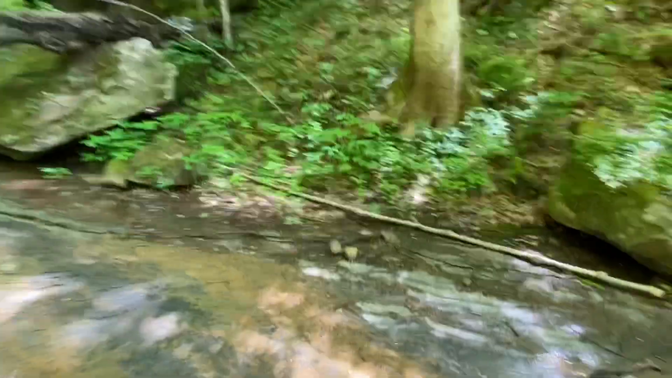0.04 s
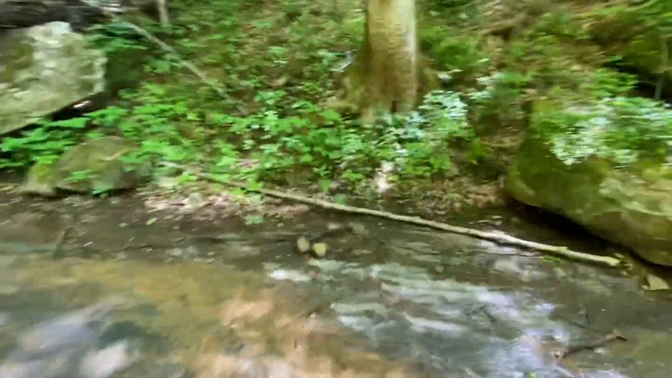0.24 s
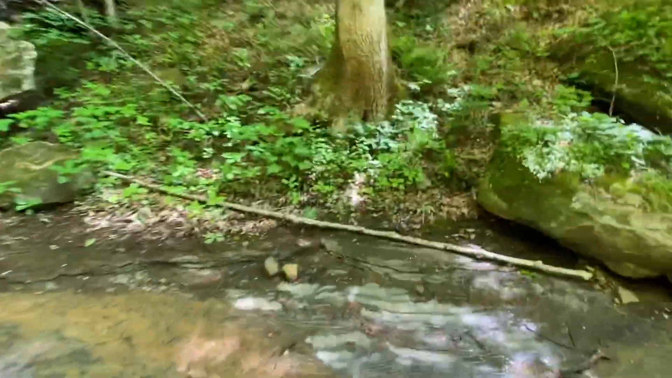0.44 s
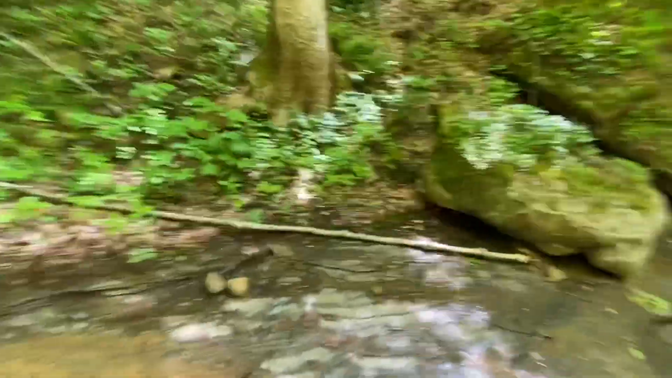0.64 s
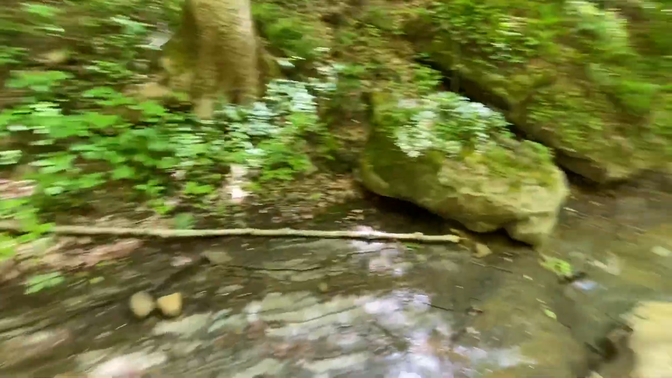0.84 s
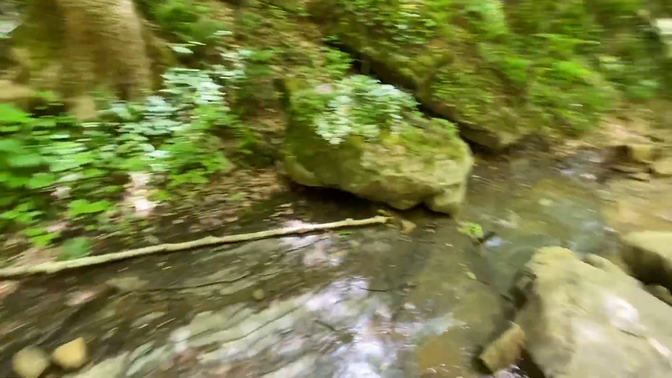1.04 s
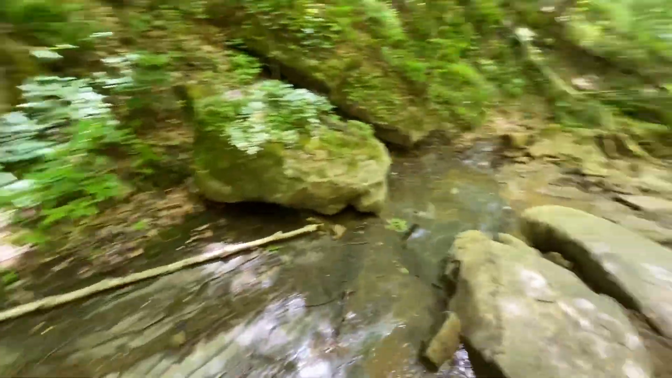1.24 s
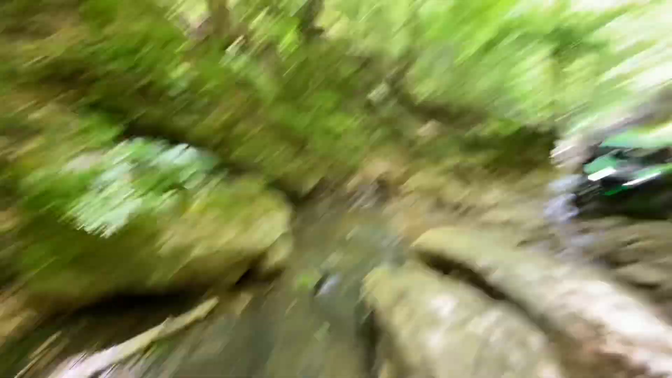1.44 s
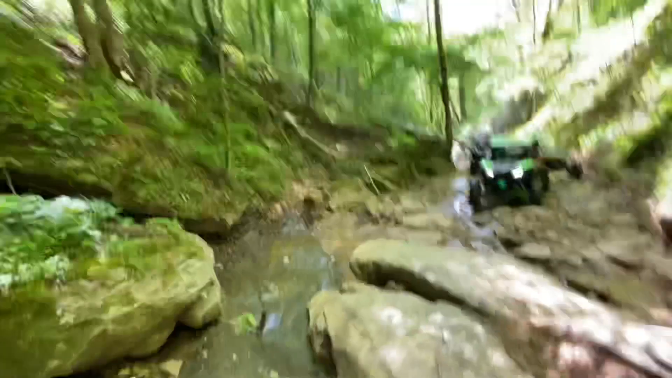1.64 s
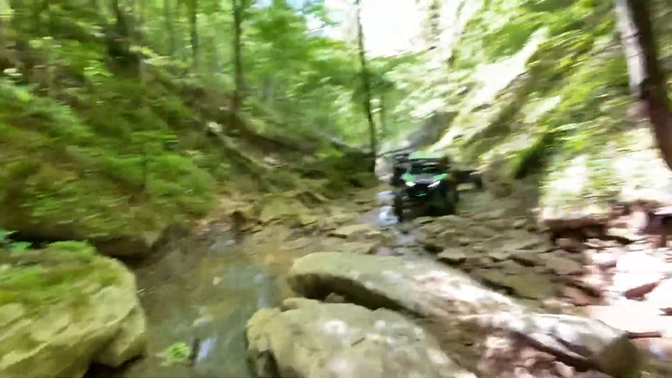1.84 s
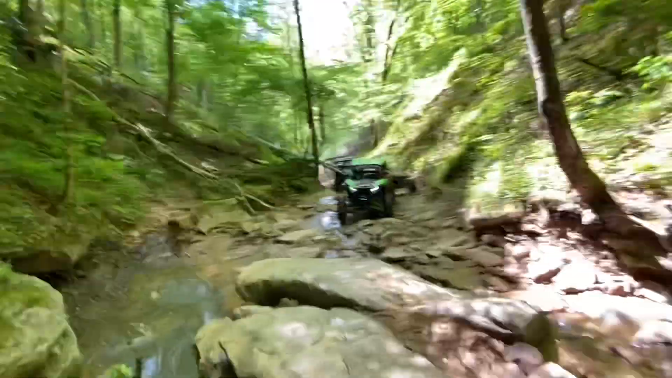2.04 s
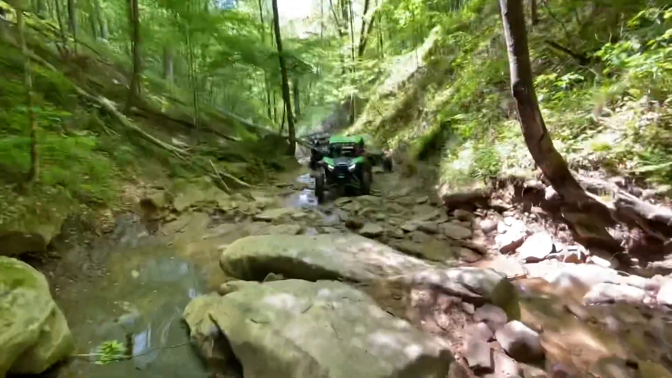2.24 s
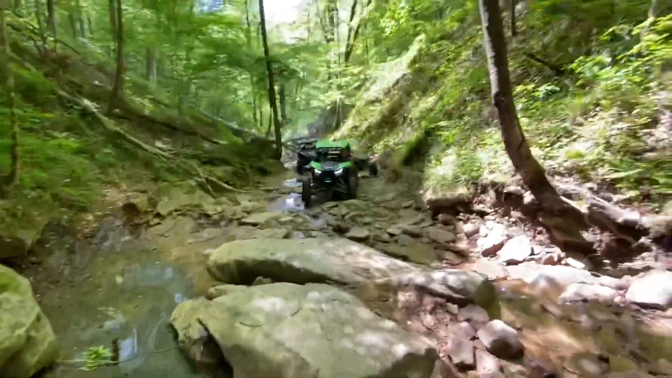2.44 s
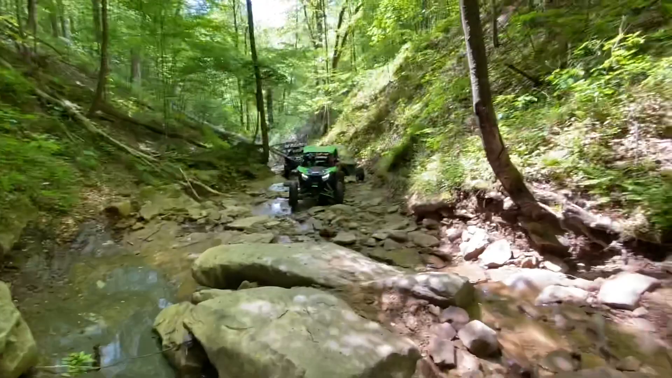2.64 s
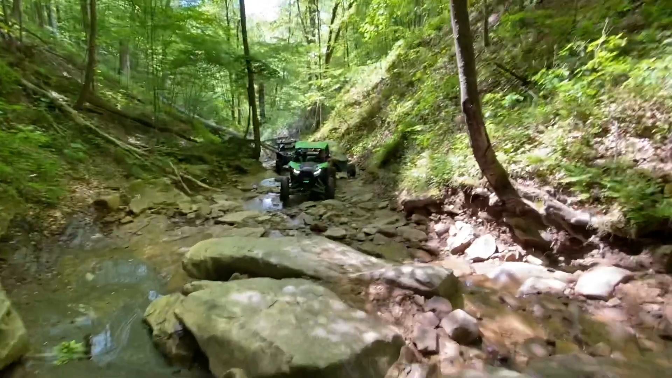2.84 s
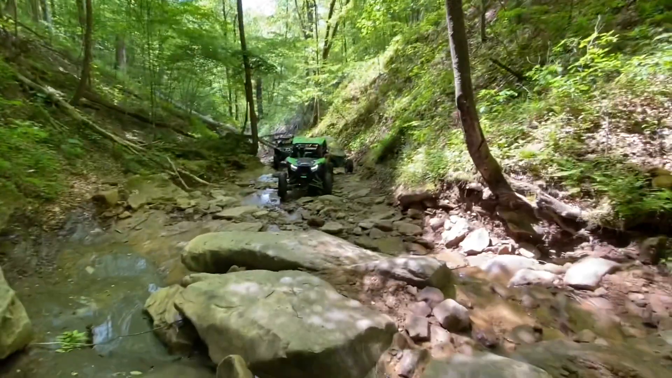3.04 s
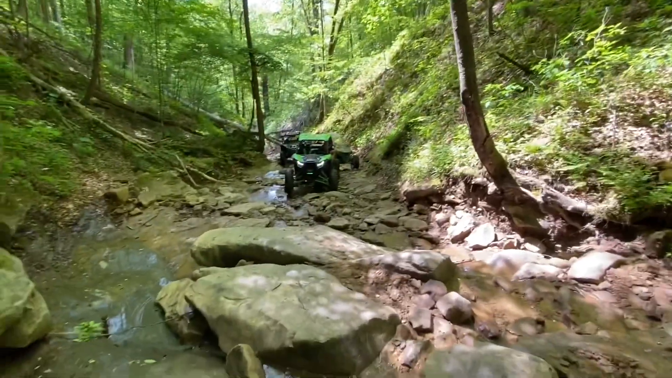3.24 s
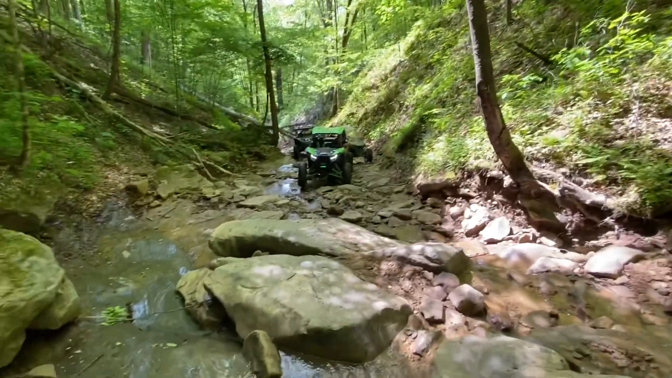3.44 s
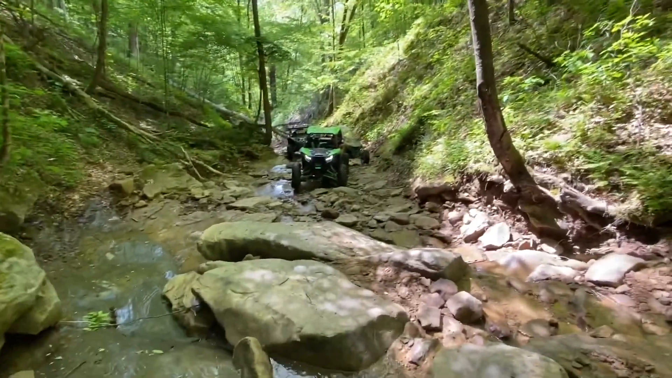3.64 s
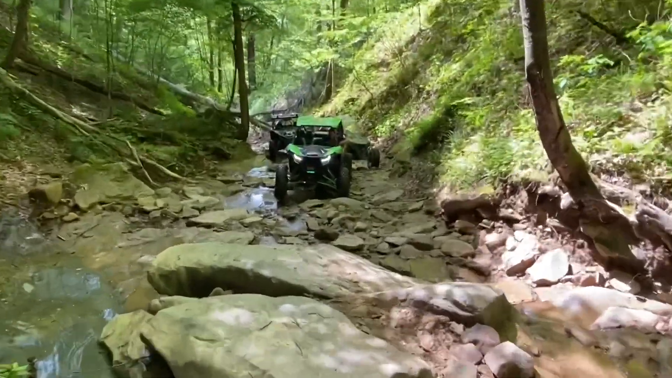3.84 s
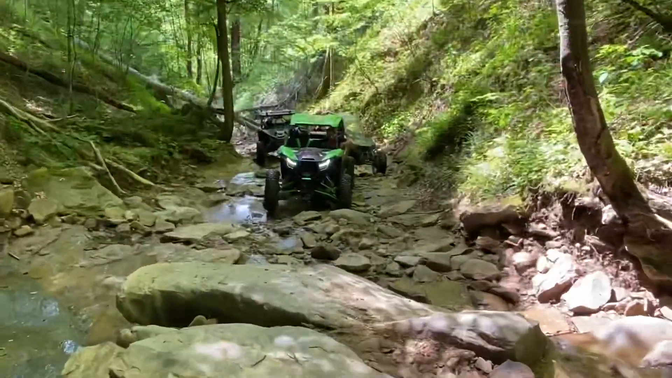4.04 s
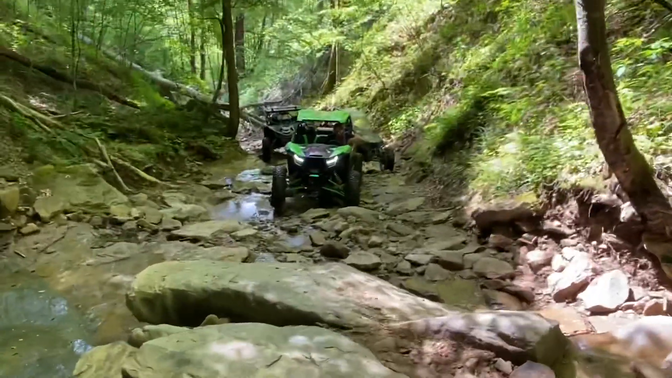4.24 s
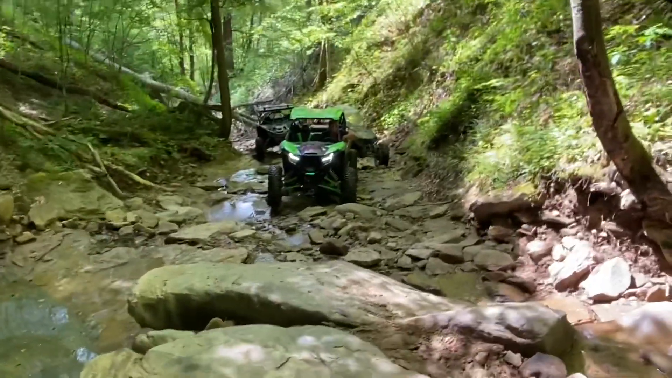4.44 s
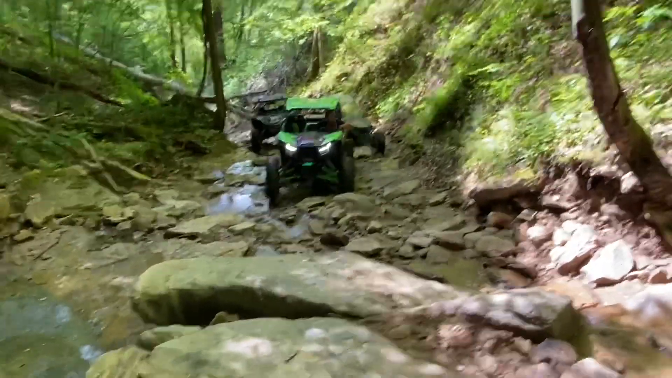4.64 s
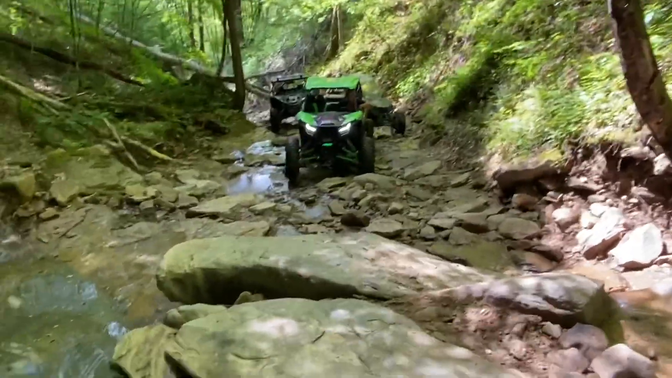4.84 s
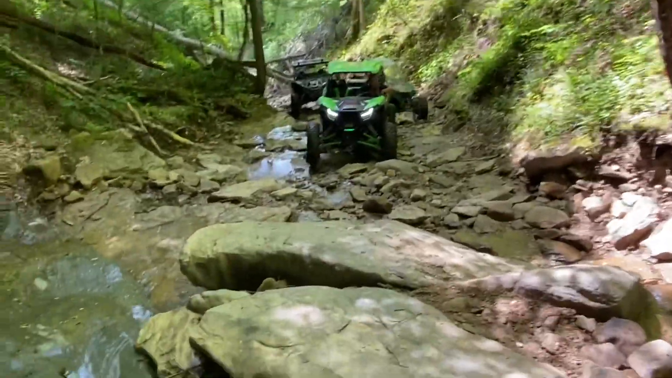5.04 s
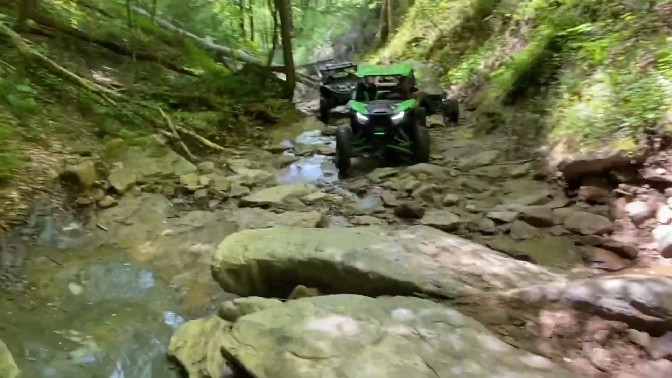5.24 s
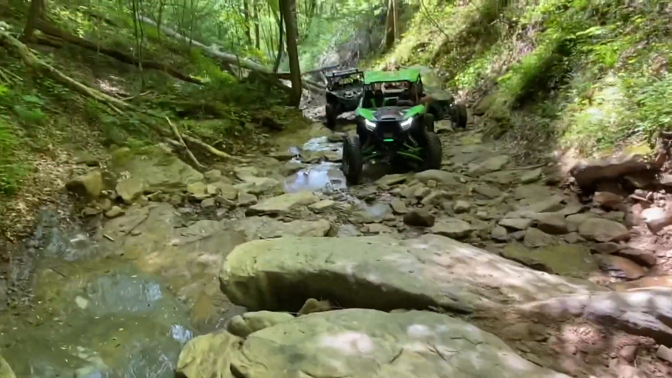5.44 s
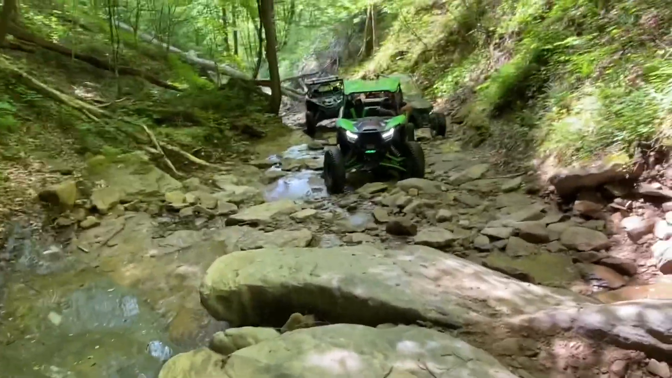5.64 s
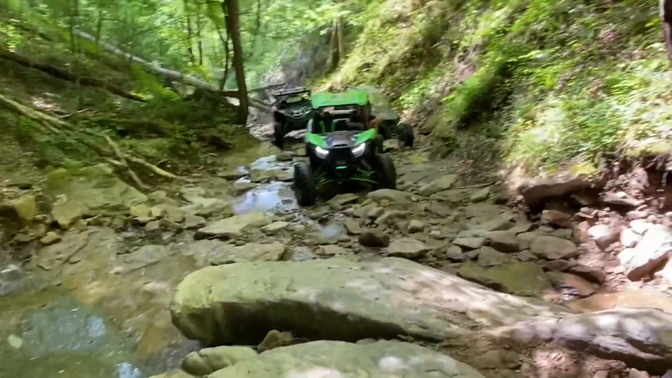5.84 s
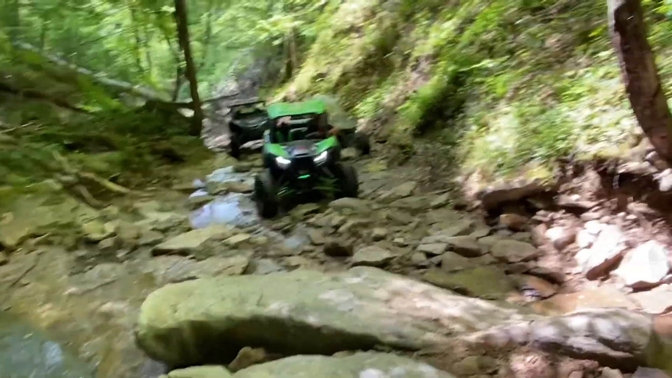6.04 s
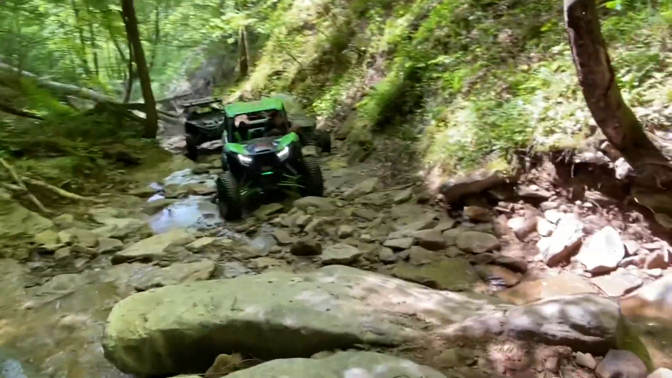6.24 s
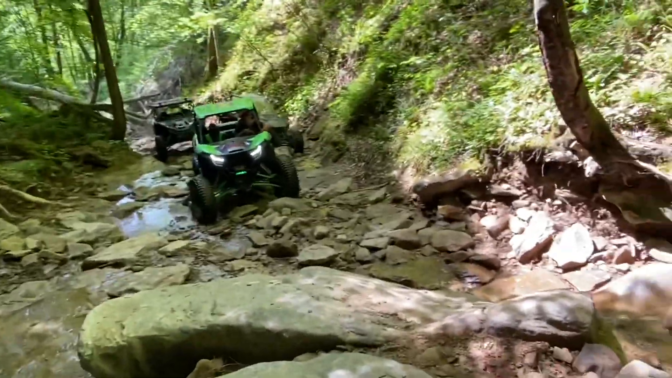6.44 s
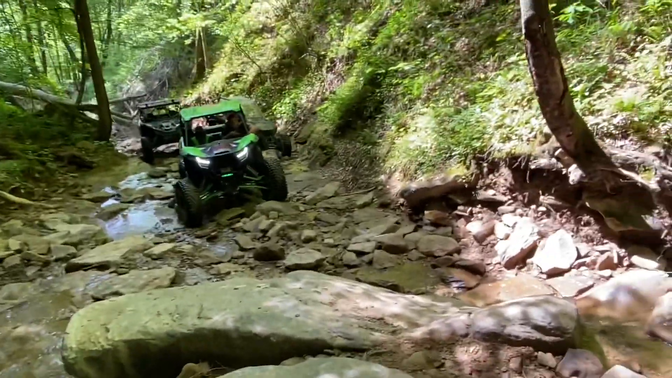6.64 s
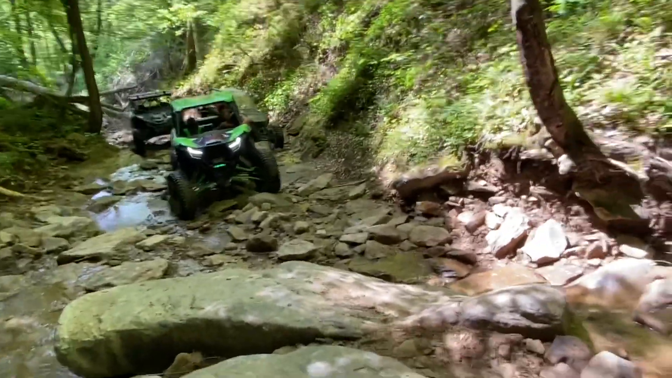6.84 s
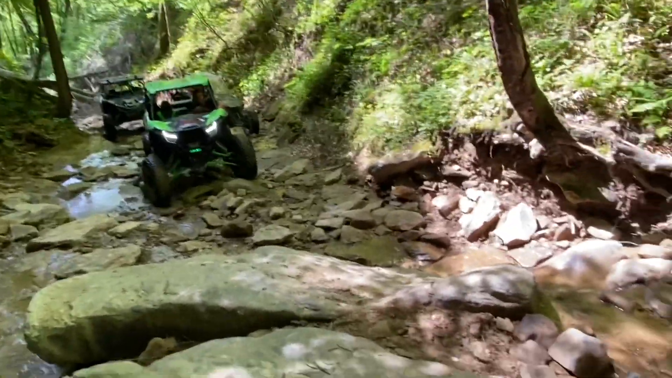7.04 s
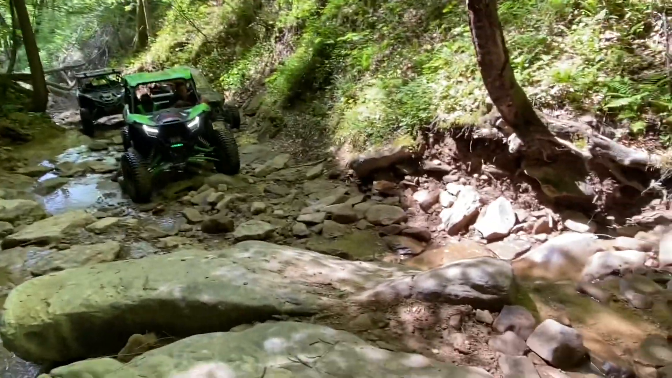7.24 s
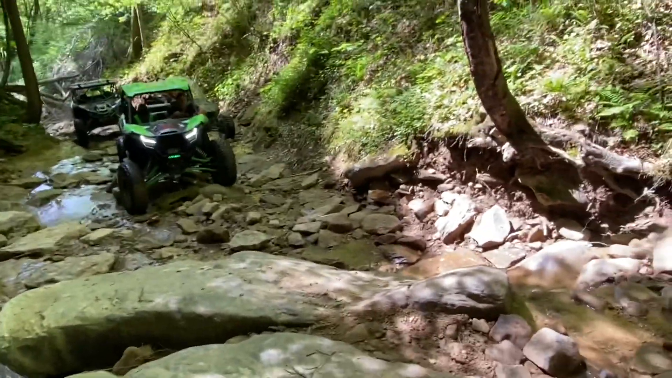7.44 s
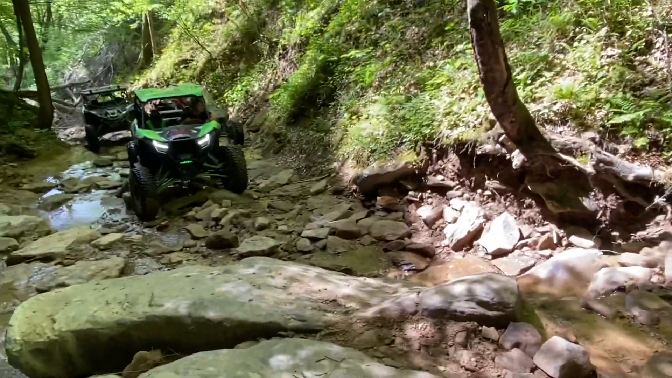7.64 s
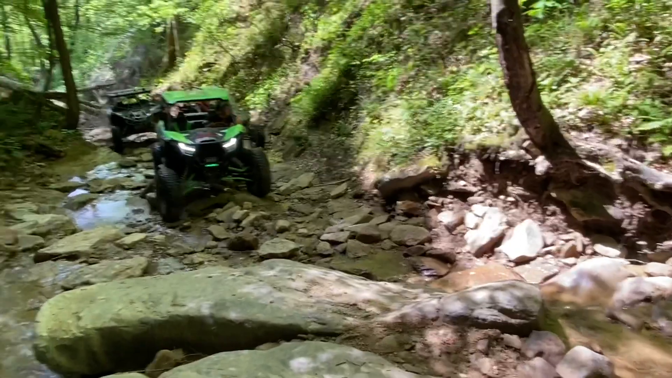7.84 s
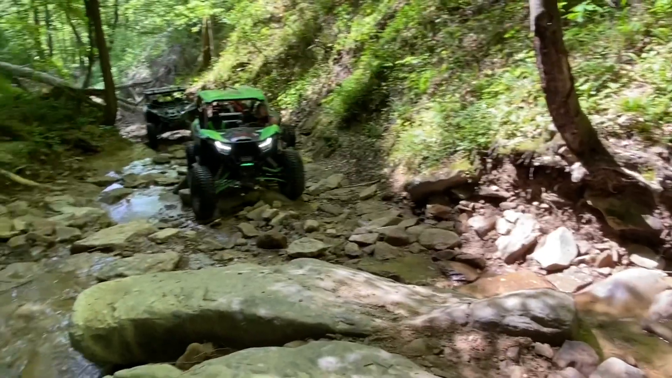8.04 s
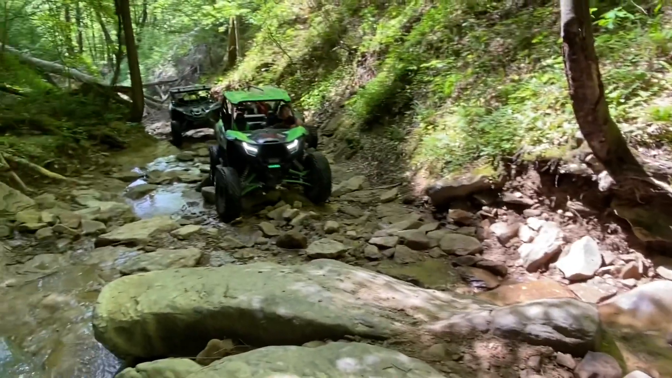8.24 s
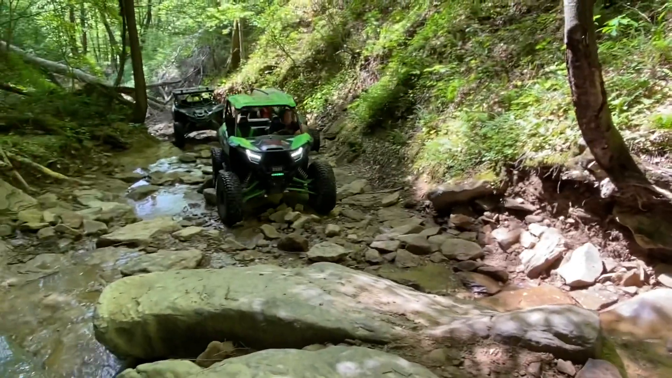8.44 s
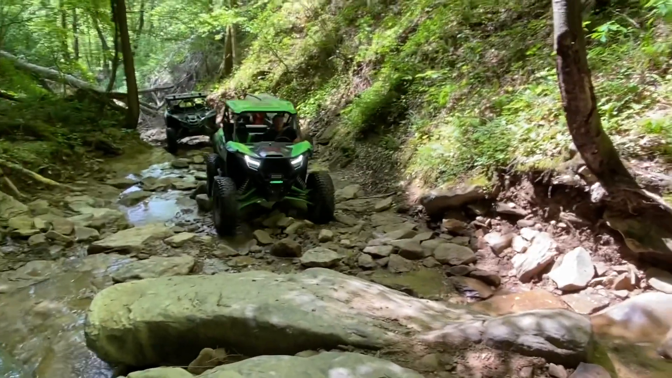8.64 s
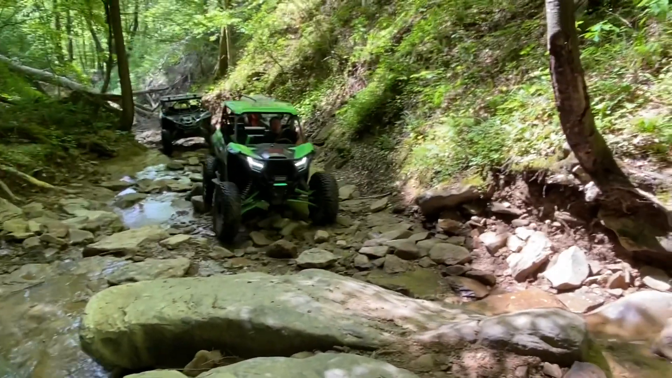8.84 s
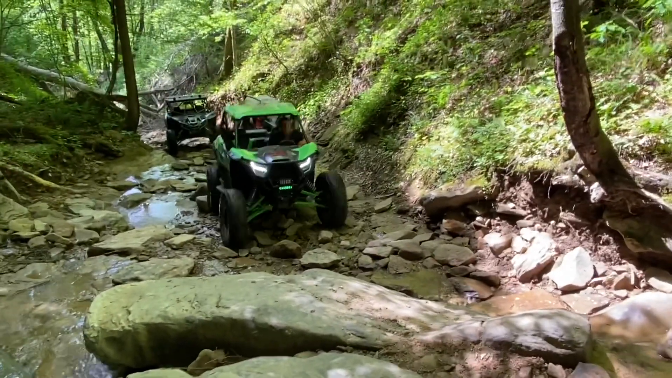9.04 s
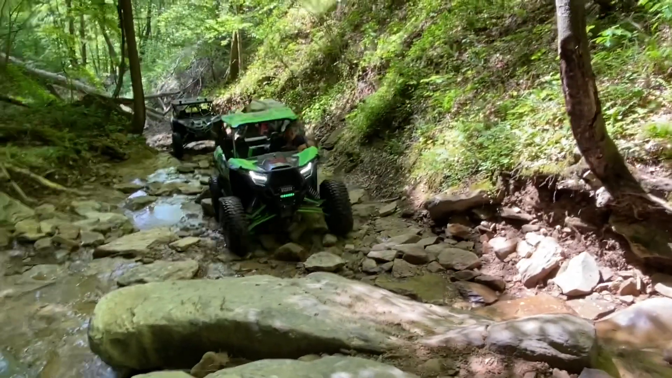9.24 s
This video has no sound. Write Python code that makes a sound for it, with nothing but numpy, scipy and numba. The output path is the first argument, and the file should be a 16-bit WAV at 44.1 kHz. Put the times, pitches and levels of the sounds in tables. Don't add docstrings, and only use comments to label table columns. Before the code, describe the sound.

Handheld stereo outdoors: thin running water and small handling thumps first, then a low rumble as the camera swings. An off-road engine cranks and settles into a slow, lumpy idle. Halfway through it revs up hard, with a deep throbbing boom and slight mechanical whine, easing and surging while wet gravel crunches, splashes plop and stones clatter, loudest near the end.

```python
import sys
import numpy as np
from scipy import signal
from scipy.fft import rfft, irfft, next_fast_len
from scipy.io import wavfile
from scipy.ndimage import uniform_filter1d, map_coordinates
from numba import njit

SR = 44100
rng = np.random.default_rng(int(sys.argv[2]) if len(sys.argv) > 2 else 0)


def transcribe(u):
    v = np.clip(np.atleast_2d(u).T, -1, 1)
    q = np.round(v * 32767).astype(np.int16)
    wavfile.write(sys.argv[1], SR, q)


def nominal_scale(level):
    x = np.asarray(level, float) / 20
    return 10 ** x


N = 410571
TIME = np.arange(N) / SR
CATCH_S, TREBLE_CHANGE_S = 2.1, 4.02
CASE_FROM_HZ = 7000


def curves(table):
    s, *columns = np.transpose(table)
    return [np.interp(TIME, s, c) for c in columns]


def on_log(table, hz):
    return np.interp(np.log(hz), np.log(np.array(table)[:, 0]), np.array(table)[:, 1])


def bell(centre_s, half_s):
    return np.exp(-((TIME - centre_s) / half_s) ** 2)


def walk(rate):
    k = int(SR / rate)
    steps = np.repeat(rng.standard_normal(N // k + 1), k)
    return 1.7 * uniform_filter1d(uniform_filter1d(steps, k), k)[:N]


@njit
def svf(x, hz, width):
    y, b, l = np.empty(len(x)), 0., 0.
    g, k = np.tan(np.pi * hz / SR), width / hz
    for i in range(len(x)):
        v = (b + g * (x[i] - l)) / (1 + g * (g + k))
        b, l, y[i] = 2 * v - b, l + 2 * g * v, k * v
    return y


def ring(x, hz, width_hz):
    y = svf(svf(x, 1. * hz, 1. * width_hz), 1. * hz, 1. * width_hz)
    span = int(.086 * SR)
    return y / np.sqrt(uniform_filter1d(uniform_filter1d(y ** 2, span), span) + 1e-18)


def ports(x, lag):
    n = next_fast_len(N)
    spectrum, hz = rfft(x, n), np.linspace(0, SR / 2, n // 2 + 1)
    high = np.clip((hz - CASE_FROM_HZ) / 800 + .5, 0, 1)
    lows = irfft(spectrum * (1 - high), n)[:N]
    turn = np.exp(2j * np.pi * (15250 - hz) / 4250)
    treble = irfft(spectrum * high * np.array([turn, np.ones_like(turn)]), n)[:, :N]
    late = map_coordinates(lows, [np.arange(N) - lag], order=3, mode="nearest")
    return np.array([late, lows]) + treble


# frequency in Hz, share common to both (0 to 1).
LIKENESS = [(100, .9), (300, .85), (700, .6), (4000, .4), (8000, .35), (10300, .8), (13000, .985)]


def rustle(colour, lag, swell_db, flicker_db, grains, grain_db):
    common, apart, swell = 0, 0, walk(7)
    for hz in 40 * 2 ** np.arange(0, 8.7, .5):
        spread_db = 3 * np.minimum(rng.exponential(size=N), 2)
        sparks = (rng.random(N) < grains / SR) * nominal_scale(grain_db + spread_db)
        far_db = -6 * (hz > 12000) * (TIME < TREBLE_CHANGE_S)
        gain = nominal_scale(on_log(colour, hz) + swell_db * swell + flicker_db * walk(12) + far_db)
        share = np.clip(on_log(LIKENESS, hz), 0, 1)
        share = share + (hz > CASE_FROM_HZ) * (TIME > TREBLE_CHANGE_S) * .99 * (1 - share)
        noise = rng.standard_normal((3, N)) * (1 + sparks)
        both, left, right = (gain * svf(svf(n, hz, hz / 2), hz, hz / 2) for n in noise)
        common = common + np.sqrt(share) * both
        apart = apart + np.sqrt(1 - share) * np.array([left, right])
    out = ports(common, lag) + apart
    return out / np.sqrt(np.mean(out ** 2))


def knocks(table, noisy):
    out, t = np.zeros(N + 4096), np.arange(4096) / SR
    for s, db, hz, t60 in table:
        skin = svf(rng.standard_normal(4096), 1. * hz, 0.73 * hz)
        hit = (np.sin(2 * np.pi * hz * t) + noisy * skin / skin.std()) * 1000 ** (-t / t60)
        start = int(s * SR)
        out[start:start + 4096] += nominal_scale(db) * hit * np.minimum(t * hz, 1)
    return out[:N]


# time in seconds, engine cycles per second (one cycle is two crank turns).
SPEED = [(1.96, 10.983), (2.37, 11.343), (2.78, 13.663), (3.17, 13.58), (3.82, 12.328), (3.82, 12.843),
         (4.6, 10.668), (5.15, 23.624), (5.47, 25.133), (5.88, 22.557), (6.29, 25.923), (6.78, 26.807),
         (7.3, 29.363), (7.81, 27.874), (8.21, 23.377), (8.77, 24.22), (9.01, 24.645), (9.31, 23.138)]


def engine_speed():
    return uniform_filter1d(curves(SPEED)[0], int(.2 * SR), mode="nearest")


# time in seconds, boom level in dB.
CATCH = [
    (1.7, -64),
    (1.935, -50),
    (2.078, -52),
    (2.126, -32),
    (2.165, -25.5),
    (2.262, -37),
    (2.372, -33.5),
    (2.416, -24.5),
    (2.47, -30),
]
# time in seconds, boom level in dB, upper minus lower boom in dB
LOAD = [(2.62, -26.5, -14), (2.9, -25, -4.5), (3.4, -25.5, -9.5), (3.9, -25.5, -9), (4.55, -26, -22),
        (4.78, -17, -12), (5.15, -16, 6), (5.55, -19.5, 3.5), (5.85, -18, 4), (6.15, -17, -3),
        (6.45, -15, 7), (6.95, -15, -1), (7.38, -16.5, 2), (7.7, -22.5, -19), (8.1, -14.5, 3),
        (8.42, -15.5, -12), (8.72, -12, 21), (9.3, -15, 13.5)]
# time in seconds, half length in seconds,
# load drop in dB, boom swing in dB, bark change in dB.
LIFTS = [
    (4.94, 0.092, 4.5, -1.5, 6.5),
    (7.14, 0.097, 8, -9, 1.5),
    (8.423, 0.93, 3.5, -4, -0.5),
    (8.965, 0.19, 0.5, -6.5, -8),
    (9.212, 0.051, 4, -31, 0),
]


def throttle(hz):
    load_db, swing_db = curves([(s, db, -12) for s, db in CATCH] + list(LOAD))
    bark_db = -27 + .95 * (hz - 24)
    for s, half_s, drop_db, turn_db, edge_db in LIFTS:
        ease = bell(s, half_s)
        load_db = load_db - drop_db * ease
        swing_db = swing_db + turn_db * ease
        bark_db = bark_db + edge_db * ease
    lower_db = load_db - 10 * np.log10(1 + nominal_scale(swing_db) ** 2)
    weak_db = np.minimum(load_db + 23, 0)
    lug_db = 5.5 * np.maximum(12.63 - hz, 0) * (TIME > 3)
    thud_db = -39 - .25 * (hz - 24) + lug_db
    return (lower_db, lower_db + swing_db, bark_db + weak_db, thud_db + weak_db), weak_db


# time in seconds, level drop in dB.
MISFIRES = [
    (4.2, 7),
    (2.24, 3),
    (4.66, 5),
]


def firings(hz, cycle):
    second_db = 2 - .14 * (hz - 12)
    for s, db in MISFIRES:
        second_db = second_db - db * (abs(TIME - s) < .5 / hz)
    turns = np.arange(np.ceil(cycle[0]), cycle[-1] - 1 / 4)
    pulses = np.zeros(N)
    for offset, size in ((0, np.ones(N)), (1 / 4, nominal_scale(second_db))):
        early_late, strength = rng.standard_normal((2, len(turns)))
        at = np.interp(turns + offset + .0008 * early_late, cycle, np.arange(N)).astype(int)
        pulses[at] += size[at] * nominal_scale(.7 * (24 / hz[at]) ** 1.1 * strength)
    return pulses


def slow_pops(pulses, hz, weak_db):
    direct = np.roll(pulses, int(.0018 * SR))
    direct = signal.sosfiltfilt(signal.butter(6, 215, fs=SR, output="sos"), direct)
    pop_db = weak_db - 35.5 + (hz - 12) - 4 * np.maximum(hz - 14, 0)
    return nominal_scale(pop_db) * ring(direct, 150, 100)


def idle_hum(pulses, hz, weak_db):
    top = 12.3
    boom_db = 17 - 2 * np.maximum(top - hz, 0)
    hum = nominal_scale(boom_db) * ring(pulses, 110.13, 11.3) - ring(pulses, 180.6, 30)
    return nominal_scale(weak_db - 42.5 - 4.2 * np.maximum(hz - top, 0)) * hum


def rock_drone(pulses):
    return nominal_scale(-22.5 - 11.4 * ((TIME - 8.4) / .22) ** 2) * ring(pulses, 167.5, 5.2)


def silencer_shell(pulses, hz):
    off_speed_db = 9.3 * np.maximum(hz - 25.5, 0) + 1.9 * np.maximum(22 - hz, 0)
    shell_db = -42 - off_speed_db - 9 * bell(8.4, .23) + 2 * walk(6)
    return nominal_scale(shell_db) * ring(pulses, 274, 20) * (TIME > CATCH_S)


# frequency in Hz, width in Hz, level in dB.
RASP = [(240.2, 48, -1), (366, 28, -13), (568, 27, -13), (703, 33, -14.5), (916, 89, -12)]


def rasp(pulses, hz):
    modes = sum(nominal_scale(db) * ring(pulses, f, w) for f, w, db in RASP)
    rasp_db = -43.5 + (hz - 28) - 2 * np.maximum(18 - hz, 0)
    return nominal_scale(rasp_db) * modes * (TIME > CATCH_S)


# frequency in Hz, width in Hz.
PIPE = [(97.5, 25), (127.3, 37.2), (152.2, 54.2), (53.5, 79)]
# delay in seconds, level in dB.
ECHOES = [(.017, -14), (.041, -16), (.058, -13.5), (.073, -35), (0.097, -23.5)]


def exhaust():
    hz = engine_speed()
    levels_db, weak_db = throttle(hz)
    cycle = np.cumsum(hz) / SR
    cycle += .48 - cycle[int(CATCH_S * SR)] + 1 / 8 + .014 * hz
    direct = firings(hz, cycle)
    pulses = direct + sum(nominal_scale(db) * np.roll(direct, int(late * SR)) for late, db in ECHOES)
    boom = slow_pops(direct, hz, weak_db) + idle_hum(pulses, hz, weak_db) + rock_drone(pulses)
    for sign, db, (f, w) in zip((1, -1, 1, -1), levels_db, PIPE):
        boom = boom + sign * nominal_scale(db) * ring(pulses, f, w)
    boom = signal.sosfiltfilt(signal.butter(4, 290, fs=SR, output="sos"), boom)
    out = boom + silencer_shell(pulses, hz) - rasp(pulses, hz)
    return out * np.clip((TIME - CATCH[0][0]) / 0.043, 0, 1), cycle % 1


# multiple of the engine cycle,
# level in dB, loudest moment in seconds, half length in seconds.
WHINE = [(2, -36.5, 7.3, 1.6), (6, -31, 7.3, 4), (10, -48, 6.6, 4), (9, -35.5, 7.4, .7), (11, -44, 7.3, .7),
         (13, -48, 7, .25), (13, -48, 8.45, .3), (14, -48.5, 6.7, .35), (16, -49, 7.45, .3),
         (20, -50, 6.9, .6), (21, -48.5, 6.95, .2), (22, -54, 6.7, .3), (24, -45, 7.35, .25),
         (24, -52, 6.5, .2), (29, -55, 6.6, .2), (31, -56, 6.8, .4)]


def whine(cycle):
    tones = 0
    for k, db, s, half_s in WHINE:
        level_db = db - 10.5 * ((TIME - s) / half_s) ** 2 + 1.5 * walk(2.876)
        tones = tones + nominal_scale(level_db) * np.sin(2 * np.pi * k * cycle)
    return tones * np.clip((engine_speed() - 18) / 4, 0, 1)


# start in seconds, peak in dB, frequency in Hz, T60 in seconds.
BUMPS = [
    (1.374, -43, 130, 0.052),
    (1.41, -36, 150, 0.042),
    (1.878, -35, 117, 0.06),
    (1.92, -25, 91, .08),
    (1.982, -29.5, 94, 0.16),
    (8.1, -18, 66.4, .12),
    (9.14, -18, 50.6, 0.11),
    (9.17, -24, 80, .1),
]


def bumps():
    return knocks(BUMPS, 0.13)


# time in seconds, grind level in dB.
ROLL = [(0, -51), (.35, -49.5), (.7, -52), (2.8, -52), (3.2, -50), (4.95, -47.5), (5.12, -44.5),
        (5.5, -43.5), (6.3, -41), (7.1, -39.5), (8.1, -41), (8.55, -38.5), (8.8, -37.5), (9.31, -38.5)]
# time in seconds, half length in
# seconds, grind change in dB, spray change in dB.
CHURNS = [
    (.25, .4, 0, -2.5),
    (4.8, .25, 0, 1),
    (5.45, .15, 0, 1.5),
    (8.85, .1, 2, -1.5),
    (8.9, .45, 0, -2),
    (9.16, .04, 3, -1),
]


def wheel_levels():
    grind_db, = curves(ROLL)
    hiss_db = np.minimum(-55.3 + .66 * (grind_db + 46.5), -47)
    for s, half_s, churn_db, spray_db in CHURNS:
        churn = bell(s, half_s)
        grind_db, hiss_db = grind_db + churn_db * churn, hiss_db + spray_db * churn
    return grind_db, hiss_db


# frequency in Hz, level in dB per Hz.
GRIND = [(150, -7), (250, 3.5), (400, -9), (700, -2.5), (1100, -4.5), (1700, -4.5), (2500, -7), (3500, -24),
         (6000, -17)]


def tyre_grind(grind_db, water, cycle, lag):
    puff = 1 + 0.044 * np.cos(2 * np.pi * (cycle - .2))
    tyres = np.sqrt(nominal_scale(grind_db) ** 2 - water ** 2 + 1e-12) * puff
    grind = tyres * nominal_scale(3.0) * rustle(GRIND, lag, 0.7, 1.4, grains=150, grain_db=8.7)
    return signal.sosfilt(signal.butter(8, 2650, fs=SR, output="sos"), grind)


# start in seconds, peak in dB, frequency in Hz, T60 in seconds.
STONES = [(5.746, -24, 1870, 0.011), (5.858, -30, 620, 0.014), (5.884, -28, 1040, 0.0077),
          (7.02, -26, 980, 0.031), (8.27, -34.5, 1150, 0.037), (8.59, -30.5, 1150, 0.039),
          (8.62, -30, 970, 0.037), (8.685, -33, 810, .02), (8.71, -28, 880, 0.032),
          (8.769, -28, 646, 0.022), (8.797, -33, 880, .025), (8.811, -25, 860, 0.038),
          (8.831, -24, 870, 0.033), (8.843, -29, 1460, .02), (8.856, -26, 950, .02),
          (8.884, -27, 2300, 0.013), (8.891, -24, 2300, 0.014), (8.91, -24, 1150, 0.032),
          (8.933, -27, 1050, .015), (8.936, -26, 1700, 0.032), (9.105, -27, 1200, .02),
          (9.14, -29, 553, 0.027), (9.169, -25, 1020, 0.02), (9.172, -26, 1780, .02),
          (9.245, -29, 650, 0.027)]
# start in seconds, peak in dB, frequency in Hz, T60 in seconds.
CHIPS = [(1.363, -32, 7040, .012), (1.363, -43, 12600, .012), (1.415, -37, 3000, 0.022),
         (5.886, -23, 2200, .012), (3.621, -45, 6000, 0.014), (4.28, -41, 8000, 0.011),
         (4.548, -45, 12000, .008), (5.007, -44, 10150, 0.0076), (5.007, -36, 4500, .01),
         (5.548, -30, 3400, .012), (5.787, -36, 5600, .01), (6.009, -37, 5000, .01),
         (6.226, -37, 5900, .01), (6.55, -35, 4530, .012), (7.312, -34, 3750, .01), (8.339, -36, 4700, .01),
         (8.535, -34, 4540, .01), (8.624, -31, 4750, .01), (5.787, -35, 11000, 0.014),
         (5.886, -20.5, 13000, 0.008), (5.886, -41, 5170, 0.0092), (7.372, -33, 9500, 0.01),
         (7.382, -33, 11640, 0.0091), (7.382, -25.5, 4630, 0.011), (7.455, -32, 4500, .008),
         (7.559, -34, 6440, 0.012), (7.679, -30, 4860, 0.012), (7.69, -30, 4060, 0.017),
         (7.95, -29, 8450, 0.0087), (8.21, -37, 12300, 0.0062), (8.705, -33, 13000, .008),
         (8.81, -33, 14000, .008), (8.89, -35, 12600, .015), (9.17, -52, 5000, 0.0078)]
# start in seconds, peak in dB, frequency in Hz, T60 in seconds.
PLOPS = [(.092, -38, 1400, .05), (.3085, -28, 1400, .01), (1.843, -33, 900, .012), (5.885, -31, 3200, .012),
         (.255, -41, 1500, .04), (1.91, -39, 1450, .06), (.476, -39, 2100, .03), (.73, -43, 2300, .02),
         (.967, -42, 5000, .02), (1.59, -41, 1100, .04), (1.66, -42, 1050, .04), (1.8, -42, 1350, .06),
         (5.26, -33, 1600, .04), (5.645, -32, 1900, .03), (5.74, -32, 1850, .06), (5.884, -24, 1000, .02),
         (5.858, -26, 720, .04)]


def stones():
    return knocks(STONES, 0.63) + knocks(CHIPS, 0.76) + knocks(PLOPS, .1)


def bubbles(count):
    when, pitch, size, cycles = rng.random((count, 4)).T
    hz = 450 * 6.5 ** pitch
    t60 = (12 + 40 * cycles) / hz
    return knocks(zip(when * (N / SR - .1), 6 * size ** 2 - 5, hz, t60), 0.03)


# frequency in Hz, level in dB per Hz.
HISS = [(1500, -46), (2500, 11), (3500, 8.5), (5000, 7), (6500, 1.5), (8000, 5.5), (10500, -0.5),
        (13000, -47), (15000, 14)]


def spray(hiss_db, lag):
    return nominal_scale(hiss_db + 8.0) * rustle(HISS, lag, 0.74, 0.72, grains=100, grain_db=16.3)


# start in seconds, peak in dB, frequency in Hz, T60 in seconds.
FINGERS = [(0.249, -40, 1450, 0.02), (0.477, -39.5, 2020, 0.023), (0.541, -50, 700, 0.028),
           (1.363, -32, 1410, 0.031), (1.372, -28, 200, 0.028), (1.386, -41, 2220, 0.016),
           (1.412, -36, 354, 0.011), (1.417, -43, 365, 0.052), (1.785, -50, 1460, .07),
           (1.842, -27.5, 470, 0.019), (1.848, -43, 1770, 0.084), (1.862, -40, 1140, 0.076),
           (1.903, -35.5, 169, 0.047), (1.904, -45, 1407, 0.21), (1.945, -48, 1390, 0.085),
           (2.085, -48, 1500, 0.08), (1.93, -48, 2250, .04), (1.96, -54, 1700, .04)]
# start in seconds, peak in dB, frequency in Hz, T60 in seconds.
THUMPS = [(.343, -32.5, 270, .045), (.359, -34, 340, .04), (.381, -35, 1000, .015), (.383, -35, 390, .03),
          (.403, -38, 1900, .015), (.545, -39, 720, .04), (.6, -41, 400, .04), (.72, -43, 650, .03),
          (.92, -45, 600, .03), (1.843, -31, 430, .04), (2.125, -38, 290, .08)]


def fingers():
    return knocks(FINGERS, 0.89) + knocks(THUMPS, .25)


# time in seconds, level in dB.
GRIP = [
    (0, -71),
    (.174, -73),
    (.36, -66),
    (.5, -68),
    (1.164, -70),
    (1.39, -60),
    (1.586, -60),
    (1.73, -59),
    (1.899, -41),
]


def grip():
    rumble = np.array([ring(n, 55, 88) for n in rng.standard_normal((3, N))])
    squeeze_db = np.full(N, -79.)
    for s, db in GRIP:
        fade_db = np.minimum(348 * (TIME - s), 92 * (s - TIME))
        squeeze_db = np.maximum(squeeze_db, db + fade_db)
    return nominal_scale(squeeze_db) * (TIME < GRIP[-1][0]) * (1.05 * rumble[0] + 2.2 * rumble[1:])


# frequency in Hz, level in dB per Hz.
CREEK = [(40, -32), (100, -12), (230, -11), (400, -1), (700, 5.5), (1500, 5), (2500, 0.5), (3500, -42),
         (6000, -46)]


def creek(water, lag):
    return water * nominal_scale(2.0) * rustle(CREEK, lag, 0.2, 2.6, grains=200, grain_db=17.5)


# start in seconds, length in seconds, start pitch in Hz, end pitch in Hz, level in dB.
CHIRPS = [(0.424, 0.016, 7900, 7700, -43), (.455, 0.043, 7850, 7650, -51), (2.45, 0.058, 4750, 4740, -46),
          (2.49, .02, 5250, 5350, -49), (2.588, 0.037, 5550, 5200, -42.5), (2.608, 0.03, 5000, 5250, -43),
          (2.615, 0.044, 5850, 5950, -56), (2.018, .03, 7900, 7800, -56), (2.09, .03, 8400, 8100, -49),
          (2.636, 0.023, 5250, 5050, -46), (2.66, 0.056, 5150, 5000, -52)]


def birds():
    out = np.zeros(N)
    for s, length, start_hz, end_hz, db in CHIRPS:
        start, n = int(s * SR), int(length * SR)
        glide = np.linspace(start_hz, end_hz, n) * (1 + 0.0084 * walk(370)[:n])
        out[start:start + n] += nominal_scale(db) * np.hanning(n) * np.sin(2 * np.pi * np.cumsum(glide) / SR)
    return out


def insects():
    noise = rng.standard_normal((4, N))
    upper = np.array([ring(n, 8740, 2500) for n in noise[:2]])
    lower = np.array([ring(n, 6440, 700) for n in noise[2:]])
    return nominal_scale(-61.5 + 1.8 * walk(2.3)) * upper * (TIME < TREBLE_CHANGE_S) + nominal_scale(-59.5 + walk(6.9)) * lower


# time in seconds, left lag in samples for the creek, left lag in samples
# for the buggy, buggy left minus right in dB.
TURN = [
    (0, -22, 10, -4),
    (1.4, -25, 10, -4),
    (1.8, 8, 8, -4),
    (2.8, 6, 6, -4),
    (3.2, -20, -9, -4),
    (4.3, -20, -8, -3.3),
    (5.2, -8, -7.5, -3.2),
    (9.31, -7.5, -7.5, -3.1),
]


def scene():
    creek_lag, buggy_lag, pan_db = curves(TURN)
    side = nominal_scale(np.array([pan_db, -pan_db]) / 2)
    grind_db, hiss_db = wheel_levels()
    water = np.minimum(nominal_scale(grind_db), nominal_scale(-53))
    boom, cycle = exhaust()
    buggy = side * ports(boom, 2.1 * buggy_lag)
    buggy = buggy + side * ports(whine(cycle) + bumps(), buggy_lag)
    buggy = buggy + side ** 1.17 * tyre_grind(grind_db, water, cycle, buggy_lag)
    splash = bubbles(count=450) * nominal_scale(grind_db + 5)
    buggy = buggy + ports(stones() + splash, buggy_lag)
    handling = ports(fingers(), -3.0) + grip()
    woods = ports(birds(), creek_lag) + insects()
    return buggy + spray(hiss_db, creek_lag) + handling + creek(water, creek_lag) + woods


def low_pass(x):
    return signal.sosfilt(signal.butter(12, 16820, fs=SR, output="sos"), x)


def record(dry):
    soft = np.tanh(1.105 * dry) / 0.98
    mix = signal.sosfilt(signal.ellip(8, .2, 60, 15800, fs=SR, output="sos"), soft)
    return low_pass(mix)


dry = scene()
out = record(dry)
transcribe(out)
```